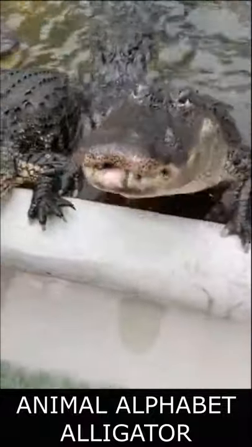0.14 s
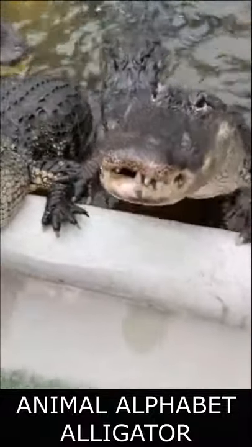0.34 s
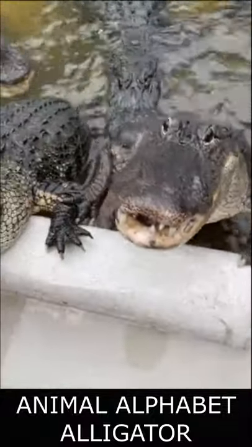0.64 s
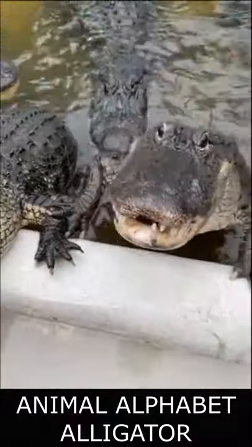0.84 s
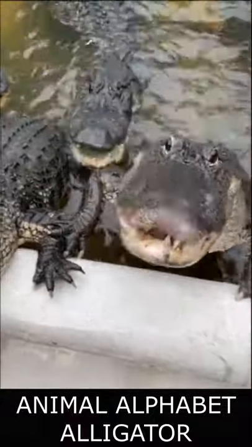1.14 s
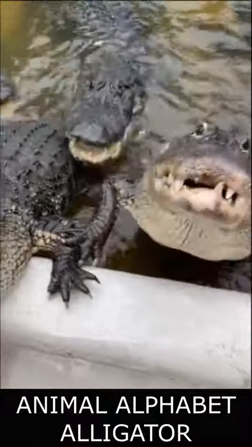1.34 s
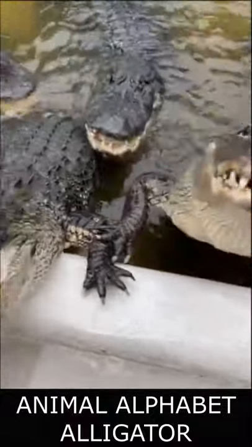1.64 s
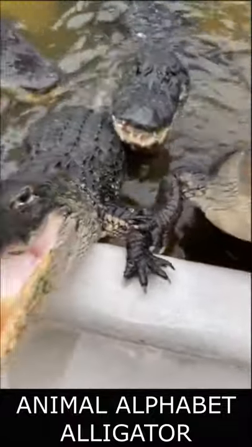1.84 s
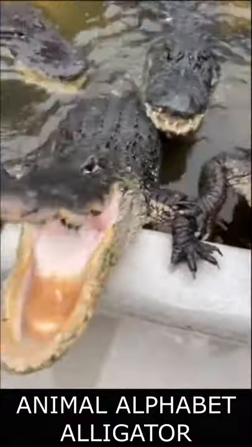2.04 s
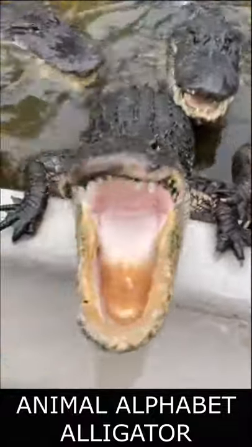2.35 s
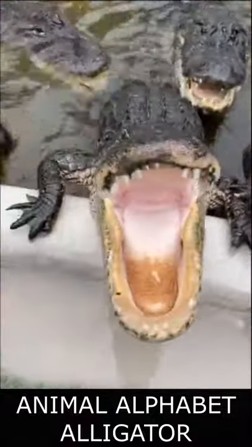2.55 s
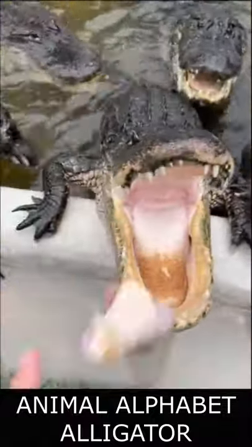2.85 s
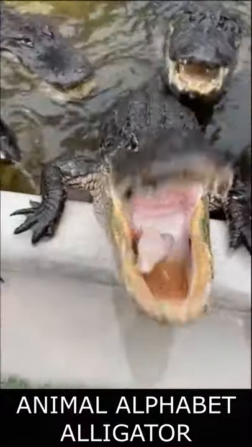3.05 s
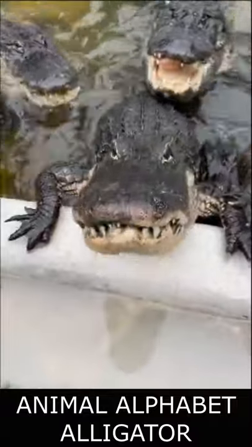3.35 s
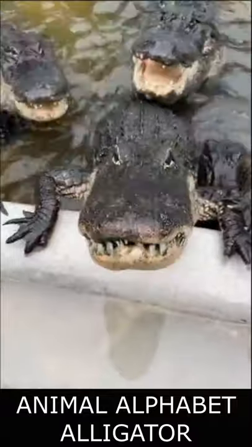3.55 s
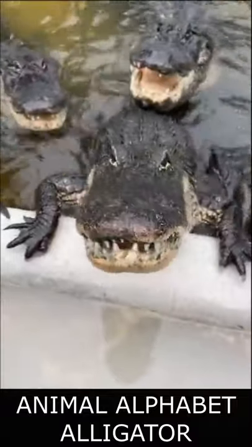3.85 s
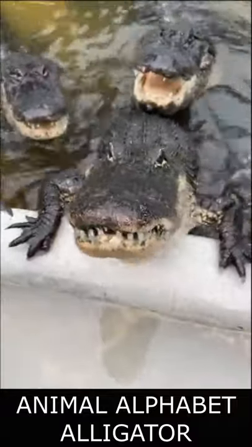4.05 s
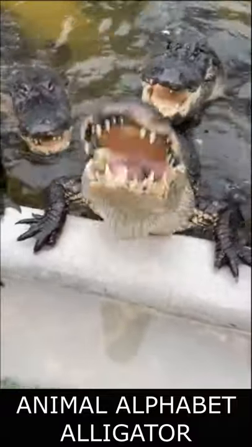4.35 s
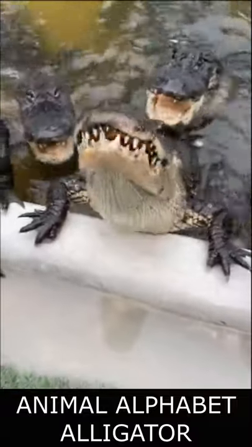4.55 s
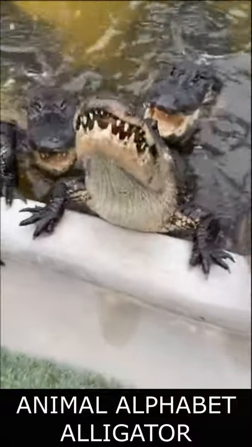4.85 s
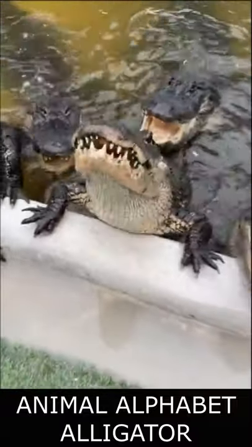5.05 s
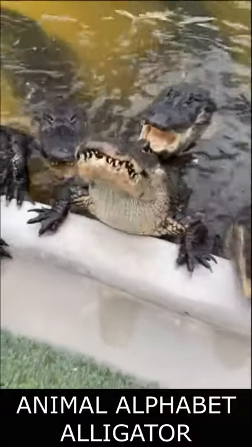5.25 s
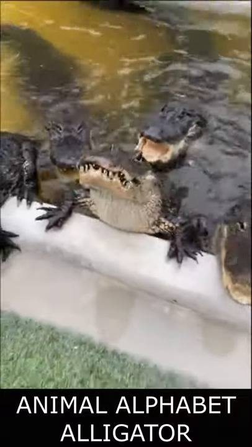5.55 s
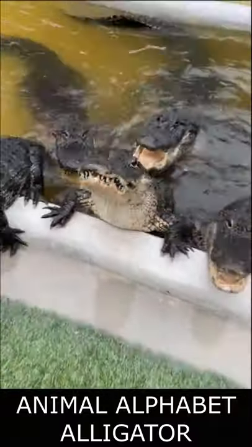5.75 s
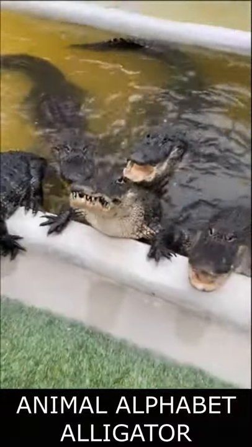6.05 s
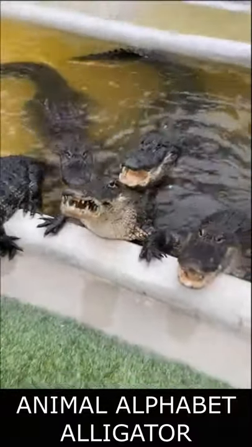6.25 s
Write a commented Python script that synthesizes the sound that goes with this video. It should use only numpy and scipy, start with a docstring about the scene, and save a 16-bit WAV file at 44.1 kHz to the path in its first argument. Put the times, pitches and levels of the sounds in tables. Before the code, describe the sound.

Right at the start, close to the microphone at the concrete rim of an outdoor pond, an alligator claps its jaws shut with a crack of teeth and a loud hollow pop. A second, lighter clap follows at 0.3 seconds. From then on, water just behind sloshes and gurgles as several animals jostle, with plops, wet slaps against the wall and fine spray. It swells around 1.4 seconds and rises to a sharp splash at 2 seconds, when a distant bird gives a short, hoarse falling whistle. Gentler lapping and single bubbles follow. Stronger surges run from about 3.4 to 5 seconds, with a distinct plop at 4.4. The bird whistles again near 5.6 seconds, and another splashy surge comes around 6 seconds. A low steady rumble and a very faint, thin electrical whine continue throughout.

```python
"""Close by, at the concrete rim of an outdoor pond, an alligator claps its jaws shut on food:
teeth crack and trapped air pops, twice in the first third of a second. Then several animals
jostle just behind: the water sloshes, slaps the wall, gulps air and throws spray. Far off, a bird
gives a falling whistle at 2 s and another near 5.6 s. A low rumble and a faint, thin electrical
whine lie under it all. The stereo microphone has two closely spaced ports."""
import sys
import numpy as np
from scipy import signal
from scipy.fft import rfft, irfft, next_fast_len
from scipy.io import wavfile
from scipy.ndimage import uniform_filter1d

SR = 44100
rng = np.random.default_rng(int(sys.argv[2]) if len(sys.argv) > 2 else 0)


def unload_wav(signal):
    """Save mono or channel-first audio to the path in sys.argv[1] as 16-bit WAV at rate SR, clipped to [-1, 1]."""
    wavfile.write(
        sys.argv[1],
        SR,
        np.round(np.clip(np.atleast_2d(signal).T, -1, 1) * 32767).astype(np.int16),
    )


N = 282681


def jaws(mouth_q=2.2, teeth_q=4, crack_db=-19):
    """Nearest the microphone: teeth crack together, then the trapped air pops hollowly."""
    # wet jaws and teeth meeting:
    # (time [s], level [dB], decay [s], mouth ring [Hz], teeth ring [Hz], teeth over mouth [dB])
    claps = [(0.0162, -13, .0045, 1750, 7200, -7), (0.031, -25, .008, 3000, 7500, -2),
             (0.0372, -10, .0016, 1100, 7800, -7), (0.0395, -19, .005, 980, 10500, -9),
             (0.3021, -12.5, .003, 1800, 5450, -1), (0.3222, -12, .004, 750, 5900, -14),
             (0.3228, -16, .0025, 1900, 3000, -5)]
    # air squeezed out of the closing mouth:
    # (time [s], level [dB], first pitch [Hz], settled pitch [Hz], glide [s], ring [s])
    pops = [(0.0175, -21, 1400, 750, .002, .007), (0.0374, -4.2, 1300, 272, .0009, .011),
            (0.039, -14, 550, 300, .005, .011), (0.0402, -12, 255, 92, .0046, .014),
            (0.041, -28, 1100, 980, .004, .02), (0.3052, -14.5, 320, 830, .004, .009),
            (0.3262, -18, 230, 300, .003, .012)]
    out = np.zeros(N)
    for s, db, decay, mouth_hz, teeth_hz, teeth_db in claps:
        hit = burst(decay)
        ring = band(hit, mouth_hz, mouth_q) + amp(teeth_db) * band(hit, teeth_hz, teeth_q)
        add(out, s, amp(db) * unit_crest(ring + amp(crack_db) * hit))
    for s, db, first_hz, settled_hz, glide_s, ring_s in pops:
        t = clock(4 * ring_s)
        hz = settled_hz + (first_hz - settled_hz) * np.exp(-t / glide_s)
        add(out, s, amp(db) * tone(hz) * np.exp(-(t / ring_s) ** 2))
    return out


def water(heave, slosh, spray, heave_db=-1, spray_db=1):
    """Stirred water: deep glugs, a churning slosh and spray, each following its own gain curve."""
    # spectra of the water's three parts: (frequency [Hz], density [dB])
    heave_spectrum = [(70, -0.5), (400, -2), (800, -7.5), (2000, -58)]
    slosh_spectrum = [(120, -35), (350, -3.5), (600, 6.5), (1000, 5), (1700, 2.5), (2700, 1), (3600, -30.5),
                      (5500, -2), (12000, -99)]
    spray_spectrum = [(700, -33.5), (2500, 9.5), (4000, 5), (7000, 5.5), (8300, 1), (11000, 0),
                      (13000, -1.5), (16000, -29)]
    glugs = swarm(130, 551, per_s=90, cycles=5.3, rise=1.27, spread_db=3) + rng.standard_normal(N)
    # most pockets burst at the surface within a few cycles; only a few ring on
    churn = swarm(350, 4000, per_s=650, cycles=6.5, rise=1.12, spread_db=2.6)
    ringing = swarm(450, 2800, per_s=75, cycles=29, rise=1.32, spread_db=2.2)
    crackle = swarm(1000, 5500, per_s=130, cycles=2.6, rise=1, spread_db=2.4)
    ticks = fizz(per_s=2400, spread_db=2.7, clump_db=1.6)
    froth = .9 * churn + .6 * ringing + .6 * crackle + .7 * ticks
    drops = swarm(3000, 12000, per_s=450, cycles=24, rise=1.06, spread_db=2.8)
    shower = .48 * drops + fizz(per_s=11000, spread_db=3.1, clump_db=.7)
    shower *= amp(1.9 * drift(32))
    # each wavelet and each small splash lifts slosh and spray together
    lapping = unit(amp(1.3 * drift(32)) * spatter(per_s=28, height=.65, decay=.006))
    surface = slosh * unit(colour(froth, slosh_spectrum))
    surface += amp(spray_db) * spray * unit(colour(shower, spray_spectrum))
    return amp(heave_db) * heave * unit(colour(glugs, heave_spectrum)) + lapping * surface


def stirring(heave_rest_db=-55, heave_under_slosh_db=-12):
    """Gain curves of heave, slosh and spray: the waves add their power to the chop."""
    # the chop that the animals keep up between surges: (time [s], slosh [dB], spray [dB])
    chop = [(0, -42, -41.5), (0.08, -61, -56.5), (0.22, -50, -53), (0.29, -50.5, -63), (0.36, -44.5, -45.5),
            (0.85, -51, -54), (1.2, -47, -51), (1.55, -46, -44), (2.2, -45, -46), (2.55, -44, -45.5),
            (2.83, -46.5, -51.5), (3.1, -40, -44), (3.3, -47, -46.5), (4.3, -49, -43), (4.55, -51, -47.5),
            (5.05, -47.5, -53), (5.25, -45, -49), (5.7, -50, -48.5), (6.41, -51, -46.5)]
    # an animal lunges or shifts: (crest [s], time to subside [s], slosh [dB], spray [dB])
    surges = [(0.344, 0.071, -37.5, -42), (0.6, 0.024, -48, -46), (1.0, 0.43, -51, -58.5),
              (1.37, 0.089, -38.5, -39.5), (1.442, 0.052, -40.5, -36.5), (1.83, 0.16, -36, -39),
              (1.977, 0.095, -31, -35.5), (2.38, 0.087, -39, -71), (3.01, 0.14, -46.5, -47),
              (3.43, 0.091, -38.5, -43.5), (3.556, 0.086, -32.5, -38.5), (3.69, 0.089, -39.5, -40),
              (3.85, 0.13, -38, -41.5), (4.15, 0.49, -38, -43.5), (4.4, .08, -40.5, -39),
              (4.87, 0.2, -39.5, -41), (5.469, 0.081, -42.5, -52), (5.868, 0.18, -38.5, -44.5),
              (6.03, 0.11, -39, -42)]
    # a whole body shoves the deep water aside: (crest [s], time to subside [s], level [dB])
    shoves = [(.35, 0.093, -33), (2.0, 0.022, -34), (4.14, 0.21, -34), (4.82, 0.19, -41.5)]
    times, *levels = np.transpose(chop)
    slosh, spray = (amp(np.interp(np.arange(N) / SR, times, db)) ** 2 for db in levels)
    for crest, subside, slosh_db, spray_db in surges:
        power = wave(crest, subside) ** 2
        slosh += amp(slosh_db) ** 2 * power
        spray += amp(spray_db) ** 2 * power
    # the deep water never rests, and it follows the slosh at a lower level
    heave = amp(heave_rest_db) ** 2 + amp(heave_under_slosh_db) ** 2 * slosh
    heave += sum((amp(db) * wave(crest, subside)) ** 2 for crest, subside, db in shoves)
    return np.sqrt([heave, slosh, spray])


def wave(crest, subside, build_share=.59):
    """Gain of one wave: it builds smoothly to its crest and drains away more slowly."""
    u = (np.arange(N) / SR - crest) / subside
    return np.exp(-np.where(u < 0, (u / build_share) ** 2, u))


def swarm(low_hz, high_hz, per_s, cycles, rise, spread_db):
    """Countless small bubbles or drops: most are faint, a few stand out."""
    out = np.zeros(N)
    for when, pitch, size, life, glide in rng.random((int(per_s * N / SR), 5)):
        hz = low_hz * (high_hz / low_hz) ** pitch
        size_db = spread_db * min(-np.log(1 - size), 2.7)
        blip = bubble(hz, hz * rise ** glide, cycles * (.5 + life) / hz)
        # high bubbles are brief, so they are taller for the same power per Hz
        add(out, when * N / SR, amp(size_db) * hz * blip)
    return unit(out)


def bubble(first_hz, last_hz, length):
    """An air pocket swells, glides as its size and depth change, and dies."""
    t = clock(length)
    u = t / t[-1]
    return tone(first_hz * (last_hz / first_hz) ** u) * abs(np.sin(np.pi * u ** .6)) ** .7


def fizz(per_s, spread_db, clump_db):
    """Spray landing as clumps of sharp ticks."""
    heights = amp(spread_db * np.minimum(rng.exponential(1, N), 4)) * rng.choice([-1, 1], N)
    landings = rng.random(N) < per_s / SR
    return unit(heights * landings * amp(clump_db * drift(110)))


def spatter(per_s, height, decay):
    """Gain of a surface where small splashes land at random, each sudden and soon over."""
    landings = (rng.random(N) < per_s / SR) * np.minimum(rng.exponential(1, N), 2)
    return 1 + height * signal.oaconvolve(landings, np.exp(-clock(.05) / decay))[:N]


def gulps(plop_rise=1.076, shudder_db=1.5):
    """Large single bubbles and plops shudder as the water above them moves; cavities linger."""
    # air ringing on under water: (time [s], level [dB], first pitch [Hz], glide over the blip [ratio])
    pockets = [(0.142, -27, 227, 0.85), (0.405, -30.5, 630, 1.17), (0.828, -31.5, 910, 0.94),
               (0.993, -34.5, 287, 1.22), (1.01, -28.5, 1274, 1.22), (1.392, -29.5, 604, 0.92),
               (1.577, -26.5, 778, 0.89), (1.746, -33, 273, 0.93), (2.371, -21, 838, 0.84),
               (2.999, -22.5, 870, 0.93), (3.429, -24.5, 2064, 1.08), (4.789, -28.5, 273, 0.87),
               (5.408, -27.5, 299, 0.85), (5.447, -30, 312, 1.65), (5.779, -30, 447, 0.85),
               (6.307, -36, 703, 1.14)]
    # pockets bursting at the surface, alone or in gurgling runs: (time [s], level [dB], pitch [Hz])
    plops = [(1.26, -34, 605), (1.273, -24, 1116), (1.332, -31, 2340), (1.371, -30, 549),
             (1.385, -28.5, 293), (1.468, -27.5, 1270), (1.607, -31.5, 1930), (1.76, -32, 292),
             (1.836, -29, 1700), (1.889, -26, 1295), (1.9405, -24.5, 1064), (1.963, -28, 550),
             (1.988, -23, 960), (1.9915, -22.5, 292), (1.995, -19, 145), (2.01, -22.5, 337),
             (2.021, -30, 310), (2.095, -28, 2600), (2.721, -35, 1340), (2.762, -32.5, 1115),
             (2.799, -38, 1120), (2.886, -36.5, 723), (2.935, -36.5, 1370), (3.068, -33.5, 514),
             (3.526, -26, 936), (3.537, -28.5, 1120), (3.538, -25, 564), (3.575, -28, 1280),
             (3.585, -32, 1040), (3.695, -31.5, 2580), (3.859, -26, 980), (3.869, -31.5, 296),
             (4.06, -32, 553), (4.08, -34, 660), (4.121, -21.5, 580), (4.129, -26.5, 916),
             (4.13, -24.5, 345), (4.146, -27.5, 620), (4.158, -24, 640), (4.173, -32, 780),
             (4.189, -30.5, 347), (4.197, -25.5, 1334), (4.225, -31, 340), (4.338, -30, 1380),
             (4.4131, -15.5, 932), (4.427, -31, 2160), (4.596, -25.5, 377), (4.657, -25.5, 176),
             (4.823, -26, 358), (4.922, -29.5, 927), (4.954, -34, 1046), (5.281, -37.5, 610),
             (5.492, -29.5, 1500), (5.595, -33, 1600), (5.882, -35, 1420)]
    # hollow tones of large air cavities:
    # (time [s], level [dB], first pitch [Hz], last pitch [Hz], length [s], roughness [0-1])
    hollows = [(0.335, -32.5, 301, 175, 0.094, 0.33), (0.514, -34, 205.5, 294, .16, 0.2),
               (0.575, -38, 165.4, 245, 0.26, 0.15), (1.033, -37.5, 446, 753, 0.083, 0.25),
               (2.869, -39, 450, 790, 0.049, 0.6), (4.551, -23.5, 124.1, 391, 0.064, 0.3),
               (5.47, -32, 768, 736, 0.058, 0.4)]
    out = np.zeros(N)
    for s, db, hz, glide in pockets:
        add(out, s, amp(db) * pocket(hz, glide))
    for s, db, hz in plops:
        length = .011 * (1000 / hz) ** .29  # lower plops last longer
        add(out, s, amp(db) * bubble(hz, hz * plop_rise, length))
    out *= amp(shudder_db * drift(400))
    for s, db, *shape in hollows:
        add(out, s, amp(db) * cavity(*shape))
    return out


def pocket(hz, glide, tail=.2, linger=1.48):
    """A large air pocket blips, then rings on softly while its glide levels off."""
    # bigger, lower pockets and those that travel far in pitch last longer
    blip_s = .01265 * (1000 / hz) ** .45 * (1 + .74 * abs(np.log(glide)))
    u = clock(5 * blip_s) / blip_s
    pitch = hz * glide ** (np.expm1(-u) / np.expm1(-1))
    blip = abs(np.sin(np.pi * np.minimum(u, 1) ** .55)) ** .8
    ring = tail * np.minimum(u, 1) * np.exp((1 - u) / linger)
    return tone(pitch) * np.maximum(blip, ring)


def cavity(first_hz, last_hz, length, rough, settle_s=.0675):
    """A short-lived cavity sweeps quickly, then settles on its pitch; a long one drifts steadily."""
    t = clock(length)
    sweep_left = (1 - t / t[-1]) ** (1 + (settle_s / length) ** 2)
    level = signal.windows.tukey(len(t), .4) * (1 - rough + rough * drift(90)[:len(t)])
    return level * tone(last_hz * (first_hz / last_hz) ** sweep_left)


def slaps(q=.51, splatter=.097):
    """Short wet smacks, dull from a wave and bright from flung drops; each trails off in a splatter."""
    # water striking hides and the wall: (time [s], level [dB], decay [s], band centre [Hz])
    smacks = [(0.7485, -28.5, 0.0043, 4500), (0.9894, -26, 0.012, 510), (1.2605, -22, 0.0061, 1400),
              (1.3733, -23.5, 0.0018, 3200), (1.4398, -22.5, 0.0063, 6030), (1.472, -22.5, 0.0045, 5500),
              (1.577, -23, 0.0012, 3800), (1.726, -22.5, 0.0046, 8000), (1.834, -22, 0.013, 7140),
              (1.87, -21, 0.0058, 8000), (1.941, -22.5, 0.0035, 990), (1.964, -27, .008, 2600),
              (1.9896, -12, 0.0026, 1640), (2.021, -21, 0.0046, 1000), (2.3426, -22.5, 0.0026, 2610),
              (3, -21.5, 0.002, 2530), (3.048, -25, 0.0037, 6000), (3.138, -24.5, 0.007, 11000),
              (3.2999, -21, 0.0073, 3120), (3.336, -27, 0.0055, 5000), (3.409, -24.5, 0.0046, 2300),
              (3.536, -26, 0.004, 2500), (3.6587, -19, 0.003, 1900), (3.6706, -21.5, 0.003, 5270),
              (3.837, -16.5, 0.0076, 2100), (4.147, -25, 0.025, 900), (4.211, -19, 0.003, 2400),
              (4.22, -22.5, 0.0049, 2180), (4.338, -28, 0.012, 1330), (4.486, -29.5, 0.0094, 2480),
              (5.2857, -29.5, 0.0036, 2200), (5.9127, -20, 0.008, 5900), (5.9938, -22, 0.0048, 7100),
              (6.064, -20.5, 0.0058, 2420), (6.285, -27, 0.0088, 4000)]
    out = np.zeros(N)
    for s, db, decay, hz in smacks:
        hit = splatter * burst(3 * decay)
        add(hit, 0, burst(decay))
        add(out, s, amp(db) * unit_crest(band(band(hit, hz, q), hz, q)))
    return out


def washes(q=1.5):
    """Water pours into a gap between bodies: a dense patter, coloured by the size of the gap."""
    # gaps filling: (crest [s], time to subside [s], level [dB], resonance [Hz])
    gaps = [(.61, 0.064, -43.5, 590), (1.39, .04, -38.5, 616), (1.775, 0.078, -38, 920),
            (4.16, 0.068, -39, 620), (4.95, 0.082, -37.5, 1030)]
    patter = fizz(per_s=3000, spread_db=2.5, clump_db=2)
    return sum(amp(db) * wave(crest, subside) * unit(band(band(patter, hz, q), hz, q))
               for crest, subside, db, hz in gaps)


def bird(high_hz=3580, low_hz=2820, slide_s=.07, length=.265, fade_db=12.5, flick_hz=1500):
    """A distant, hoarse, unsteady whistle: a quick downward flick, then a long fall that fades."""
    # the two calls: (time [s], level [dB], hoarseness [share of the pitch])
    whistles = [(2.005, -36, .017), (5.567, -35, .007)]
    out, t = np.zeros(N), clock(length)
    fall_hz = low_hz + (high_hz - low_hz) * np.exp(-t / slide_s)
    flick = bubble(high_hz + flick_hz, high_hz + .22 * flick_hz, length=.021)
    for s, db, hoarseness in whistles:
        hz = fall_hz * (1 + hoarseness * drift(600)[:len(t)])
        flutter_db = 1.5 * drift(300)[:len(t)]
        level = amp(db - fade_db * t / length + flutter_db) * signal.windows.tukey(len(t), .1)
        add(out, s, level * tone(hz))
        add(out, s - .003, amp(db - 6) * flick)
    return out


def wall_echoes(x, low_t60=.27, high_t60=.17, low_db=8, build_s=.024):
    """Scattered echoes from the pond walls; the low ones linger."""
    # the lingering echoes: (frequency [Hz], gain [dB])
    low_spectrum = [(60, -29), (200, -7.5), (400, -4.5), (1200, -21.5), (5000, -48)]
    t = clock(.6)
    low = amp(low_db - 60 * t / low_t60) * colour(rng.standard_normal(len(t)), low_spectrum)
    bright = amp(-60 * t / high_t60) * rng.standard_normal(len(t))
    tail = (low + bright) * np.minimum(t / build_s, 1)
    return signal.oaconvolve(x, tail / np.linalg.norm(tail))[:N]


def rumble(level_db=-40.5):
    """A low steady rumble, perhaps the pond's pump."""
    # its spectrum: (frequency [Hz], density [dB])
    spectrum = [(25, -25), (50, -5.5), (70, 3.5), (90, -7.5), (125, -9.5), (180, -17), (400, -29.5),
                (2000, -66)]
    return amp(level_db) * unit(colour(rng.standard_normal(N), spectrum))


def whine(waver_db=5):
    """A faint electrical whine whose two tones waver in level."""
    # thin high tones: (frequency [Hz], level [dB])
    tones = [(8441, -65), (9819, -65)]
    turn = 2 * np.pi * np.arange(N) / SR
    return sum(amp(db) * unit(amp(waver_db * drift(5)) * np.sin(hz * turn)) for hz, db in tones)


def ports(mid, side):
    """The microphone's two close ports hear the same bass and partly different treble."""
    # how much the ports differ: (frequency [Hz], side gain [dB])
    width = [(100, -43), (380, -27.5), (700, -16.5), (1400, -33), (2800, -12.5), (5500, -4.5),
             (11000, -6.5)]
    # the left port is shaded in the middle range: (frequency [Hz], left minus right [dB])
    shade = [(100, 0), (380, -1.4), (700, -1.6), (1400, -.6), (5000, 0)]
    side = colour(side, width)
    size = next_fast_len(N)
    left = irfft(rfft(mid + side, size) * gain_at(np.fft.rfftfreq(size, 1 / SR), shade), size)
    return np.array([left[:N], mid - side])


def amp(db):
    """Decibels to gain."""
    return 10 ** (np.asarray(db) / 20)


def unit(x):
    """Scales to rms 1."""
    return x / np.sqrt(np.mean(x ** 2) + 1e-20)


def unit_crest(x):
    """Scales to a typical crest of 1, judged by the loudest two milliseconds."""
    return x / (2 * np.sqrt(uniform_filter1d(x ** 2, SR // 500).max()))


def add(mix, s, sound):
    """Lays a sound into the mix at s seconds."""
    part = mix[max(round(s * SR), 0):][:len(sound)]
    part += sound[:len(part)]


def clock(length):
    """Sample times of a sound of this length in seconds."""
    return np.arange(int(length * SR) + 8) / SR


def tone(hz):
    """A sine that follows a pitch curve."""
    return np.sin(2 * np.pi * np.cumsum(hz) / SR)


def burst(decay):
    """A crowd of tiny impacts that starts at once and thins out."""
    t = clock(6 * decay)
    return rng.standard_normal(SR)[:len(t)] * np.exp(-t / decay)


def drift(per_s):
    """A random curve of rms 1 that turns about per_s times a second."""
    knots = rng.standard_normal(4096)
    return unit(np.interp(np.arange(N) / SR * per_s, np.arange(len(knots)), knots))


def gain_at(freqs, spectrum):
    """Gains along a (frequency [Hz], level [dB]) curve."""
    hz, db = np.transpose(spectrum)
    return amp(np.interp(np.log(freqs + 1), np.log(hz), db))


def colour(x, spectrum, size=8192):
    """Minimum-phase filter that follows a spectrum."""
    log_gain = np.log(gain_at(abs(np.fft.fftfreq(size, 1 / SR)), spectrum))
    taps = np.fft.ifft(np.exp(np.conj(signal.hilbert(log_gain)))).real[:size // 2]
    return signal.oaconvolve(x, taps)[:len(x)]


def band(x, hz, q):
    """One resonance of sharpness q, narrowed if too wide for the sample rate."""
    hz = min(hz, SR / 3)
    return signal.lfilter(*signal.iirpeak(hz, max(q, 3 * hz / SR), fs=SR), x)


def scene(jaw_echo_db=-23, splash_echo_db=-17, bird_echo_db=-4, side_echo_db=6):
    """From the pond's rim: jaws nearest, water just behind, the bird far off among its echoes."""
    bite = jaws()
    splash = gulps() + slaps() + washes()
    song = bird()
    stir = stirring()
    to_walls = amp(jaw_echo_db) * bite + amp(splash_echo_db) * splash + amp(bird_echo_db) * song
    mid = bite + splash + song + wall_echoes(to_walls) + water(*stir) + rumble() + whine()
    side = water(*stir) + amp(side_echo_db) * wall_echoes(to_walls)
    return ports(mid, side)


def record(dry, edge_hz=15900):
    """The overall tone colour, then the band limit."""
    # two narrow dips, a lift near 10.7 kHz, dull treble above 13 kHz: (frequency [Hz], gain [dB])
    tone_colour = [(4400, -0.5), (4850, -5.5), (5150, -1), (8200, -1.5), (8700, -5), (9000, -20),
                   (9550, -7.5), (10000, 2), (10700, 6), (11500, 3.5), (12100, 0.5), (13100, -10.5),
                   (15500, -24)]
    heard = np.array([colour(channel, tone_colour) for channel in dry])
    band_limit = signal.firwin(511, edge_hz, window=("kaiser", 9), fs=SR)
    return signal.oaconvolve(heard, band_limit[None], "same")


dry = scene()
out = record(dry)
unload_wav(out)
```